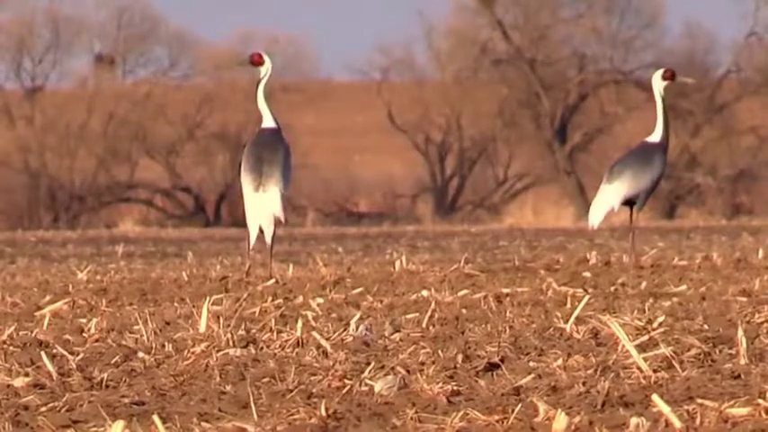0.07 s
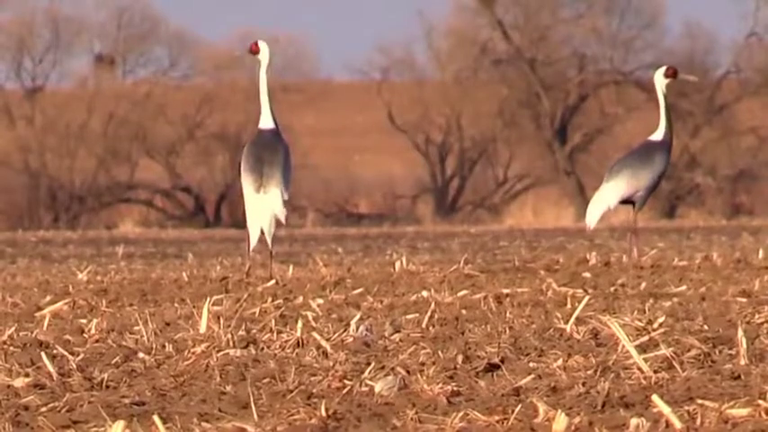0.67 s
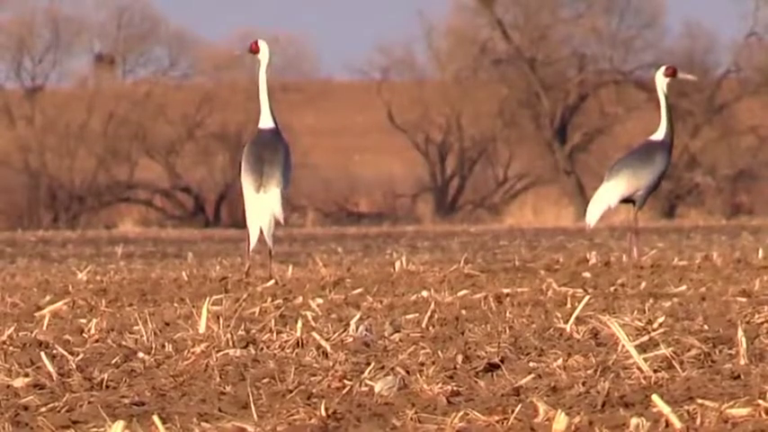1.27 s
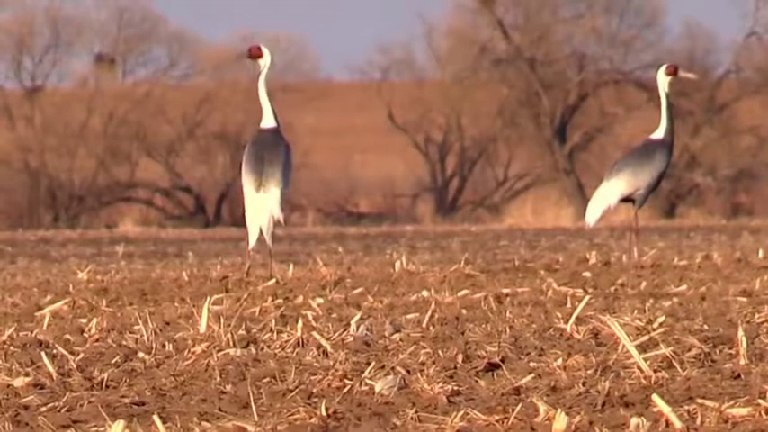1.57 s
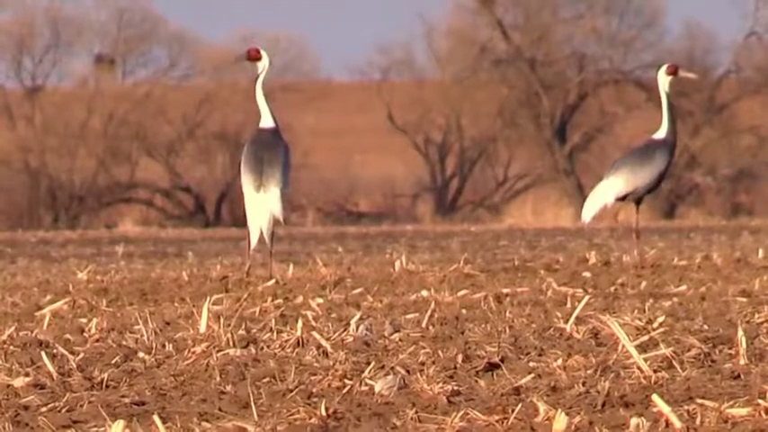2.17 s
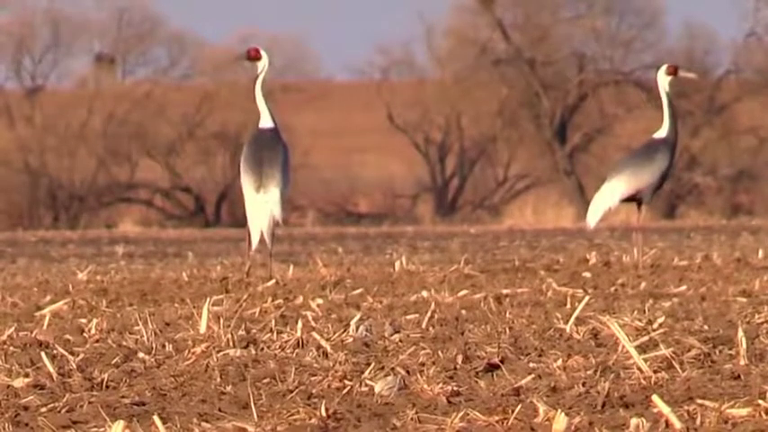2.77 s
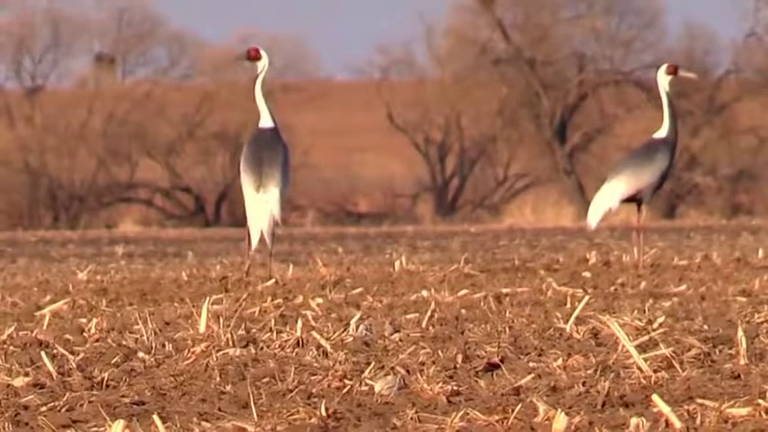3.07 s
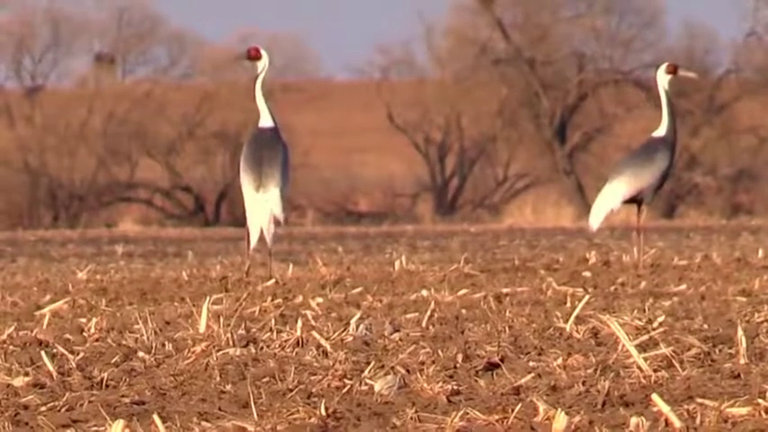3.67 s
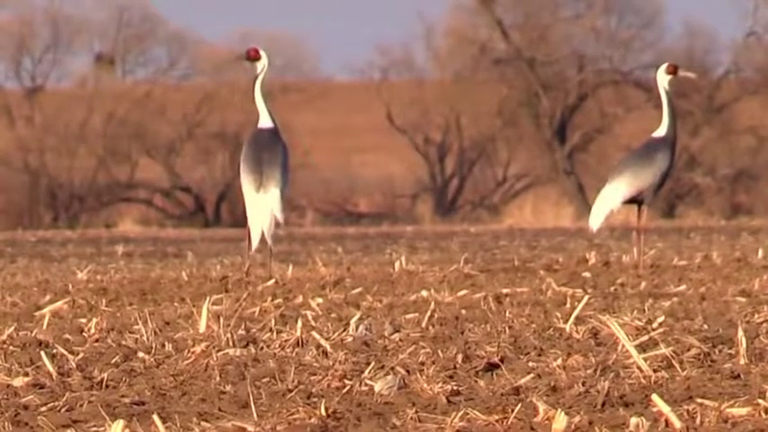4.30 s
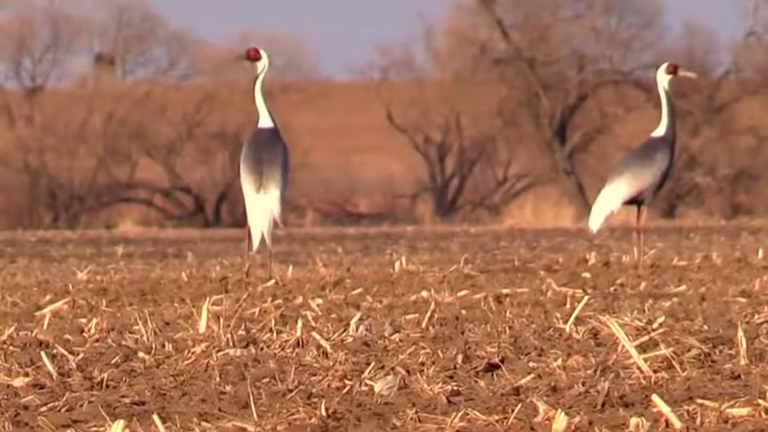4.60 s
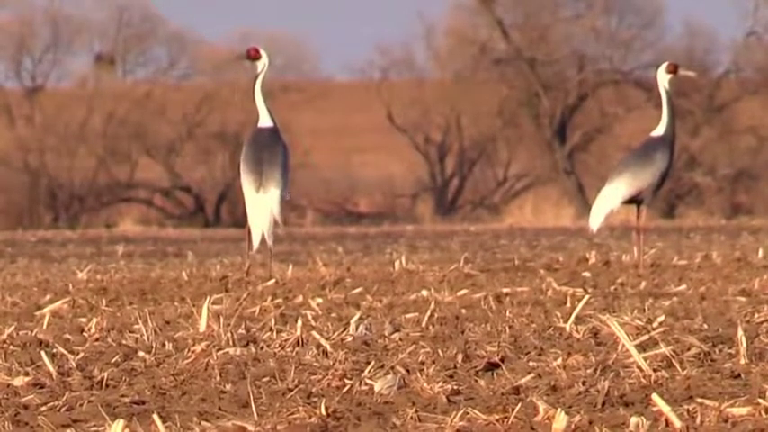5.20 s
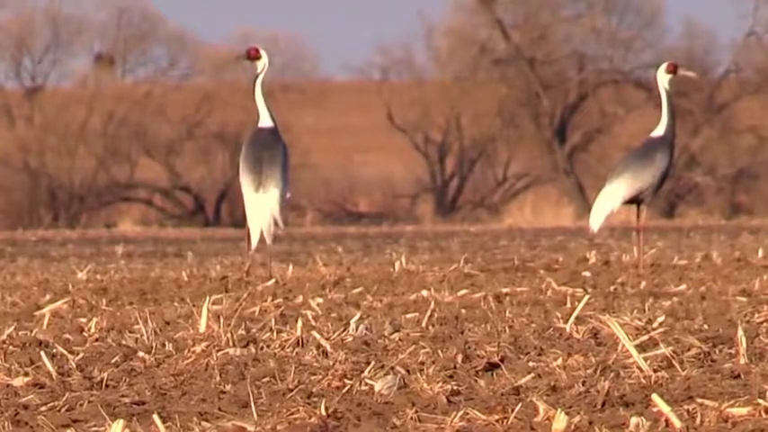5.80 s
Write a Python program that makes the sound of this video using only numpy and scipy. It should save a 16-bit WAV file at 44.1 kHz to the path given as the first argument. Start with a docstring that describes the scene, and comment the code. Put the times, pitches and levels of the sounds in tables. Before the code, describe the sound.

Low, fluttering wind buffets the microphone on the right, with small scuffs and taps, while a faint airy hiss sits on the left.

```python
"""Wind buffets a camera's right microphone in a stubble field: eddies rumble, thump, flutter and puff.
On that side the hollow camera body rushes in the moving air, and something dry close by
rustles, brushes and scuffs in showers of tiny slips, now and then knocking lightly on the camera.
The sheltered left side carries only the soft, even hiss of the open air."""
import sys
import numpy as np
from scipy import signal
from scipy.fft import rfft, irfft
from scipy.io import wavfile
from scipy.ndimage import uniform_filter1d

SR = 44100
rng = np.random.default_rng(int(sys.argv[2]) if len(sys.argv) > 2 else 0)


def transcribe(signal):
    """Save signal, clipped to [-1, 1], as a 16-bit WAV file at the path in sys.argv[1]."""
    frames = np.atleast_2d(signal).T
    limited = np.clip(frames, -1, 1)
    pcm = np.round(limited * 32767).astype(np.int16)
    wavfile.write(sys.argv[1], SR, pcm)


N = 266805
TIME = np.arange(N) / SR

# how hard the dry surfaces rub: time_s, level_db
RUBBING = [(0.0, -60), (0.78, -68), (1.12, -58.5), (1.21, -58.5), (1.42, -54), (1.8, -62.5), (1.95, -57.5),
           (2.2, -57), (2.47, -58.5), (2.89, -61.5), (3.15, -57), (3.42, -57), (3.48, -48.5), (3.66, -54),
           (3.8, -54), (3.94, -50), (4.09, -50), (4.18, -56), (4.29, -49.5), (4.71, -52.5), (4.83, -50),
           (4.99, -51.5), (5.27, -59), (5.38, -52.5), (5.69, -57.5), (5.9, -46.5), (6.05, -51)]


def amp(db):
    """Decibels to gain."""
    return 10 ** (np.asarray(db) / 20)


def unit(x):
    """Scales to an rms of one."""
    return x / np.sqrt(np.mean(x ** 2) + 1e-20)


def follow(curve):
    """Gain envelope through breakpoints of time_s, level_db."""
    return amp(np.interp(TIME, *np.transpose(curve)))


def colour(x, spectrum):
    """EQs x by rows of freq_hz, gain_db, rolling off past both ends; rms one."""
    hz = np.fft.rfftfreq(len(x), 1 / SR)
    points_hz, db = np.transpose(spectrum)
    rolloff = np.minimum(hz / points_hz[0], 1) ** 2 / np.maximum(hz / points_hz[-1], 1) ** 6
    gain = amp(np.interp(np.log(hz + 1), np.log(points_hz + 1), db)) * rolloff
    return unit(irfft(rfft(x) * gain, len(x)))


def wander(rate_hz):
    """Smooth random modulation up to about rate_hz; rms one."""
    hz = np.fft.rfftfreq(N, 1 / SR)
    return unit(irfft(rfft(rng.standard_normal(N)) * np.exp(-(hz / rate_hz) ** 2), N))


def slips(per_s, spread_db, size=N):
    """Tiny friction slips: a random train of clicks of uneven strength; rms one."""
    strength = amp(spread_db * np.minimum(rng.exponential(1, size), 4))
    polarity = rng.choice([-1, 1], size)
    slipping = rng.random(size) < per_s / SR
    return unit(strength * polarity * slipping)


def add(mix, s, sound):
    """Mixes in a sound centred on time s."""
    start = round(s * SR) - len(sound) // 2
    heard = sound[max(-start, 0):]
    part = mix[max(start, 0):][:len(heard)]
    part += heard[:len(part)]


def open_air():
    """A bed of even, pinkish hiss that swells slightly with the breeze."""
    # tone of the open air: freq_hz, gain_db
    air_eq = [(10.0, 5.5), (25.0, -6), (70.0, -2), (160.0, -7), (350.0, -12.5), (800.0, -16.5),
              (1600.0, -20.5), (3200.0, -23.5), (7000.0, -28), (12000.0, -29.5)]
    # strength of the breeze: time_s, level_db
    breeze = [(0.0, -54.5), (3.3, -53.5), (4.05, -51.5), (4.3, -54), (5.3, -52.5), (6.05, -54)]
    waver_db = .45 * wander(rate_hz=15)
    return colour(rng.standard_normal(N), air_eq) * follow(breeze) * amp(waver_db)


def body_rush(wind_db=-56.0, rub_db=-6, flutter_db=2.0, tap_share=0.17):
    """Moving air and tiny taps sound the hollow camera body below 1 kHz, more so under hard rubbing."""
    # resonances of the body: freq_hz, gain_db
    body_eq = [(250, -3.5), (450, -2), (620, -5.5), (830, -2), (960, -13.5), (1250, -25), (2000, -27.5),
               (4500, -41.5), (12500, -42)]
    air = np.sqrt(1 - tap_share) * rng.standard_normal(N)
    taps = np.sqrt(tap_share) * slips(per_s=200, spread_db=3)
    strength = np.hypot(amp(wind_db), amp(rub_db) * follow(RUBBING))
    return colour(air + taps, body_eq) * strength * amp(flutter_db * wander(rate_hz=45))


def rustle(trim_db=-5.0):
    """Dry surfaces slide over each other in dense slips, with a slightly uneven grip."""
    # tone of the dry friction: freq_hz, gain_db
    rustle_eq = [(500, 17.5), (1200, 5.5), (1700, 3.5), (2500, 6), (3200, 1.5), (4300, 7), (5100, 2.5),
                 (5900, -4), (6800, -4), (8200, -7), (10000, -12), (12500, -16)]
    grains = colour(slips(per_s=7000, spread_db=4.0), rustle_eq)
    grip_db = 1.1 * wander(rate_hz=22)
    return grains * follow(RUBBING) * amp(trim_db + grip_db)


def brushes():
    """Each light stroke is a crisp cluster of slips that swells and fades; the shortest ones snap."""
    # tone of brushed dry material: freq_hz, gain_db
    crisp_eq = [(550, -5), (830, -4), (1100, -1), (1900, 4.5), (2650, 10), (3300, 1.5), (4300, 7.5),
                (5350, 7), (5900, -2), (6800, 2), (8300, -2), (10500, -8), (12500, -17)]
    # brush strokes: centre_s, level_db, half_length_s, tilt_db_per_octave
    strokes = [(0.03, -68, .02, 0), (0.16, -63, .0035, 2), (0.27, -67, .015, 1), (0.296, -61, .003, 1),
               (0.588, -70, .012, 2), (0.646, -71, .012, 4), (0.788, -69, .01, 4), (0.85, -64, .018, 1),
               (0.99, -63.5, .022, 0), (1.06, -62, .03, 0), (1.37, -66, .1, 0), (1.133, -60, .002, 0),
               (1.16, -66, .025, 0), (1.616, -64, .003, -2), (1.711, -62, .005, -2), (1.892, -59, .008, -2),
               (2.305, -63, .007, -4), (2.274, -53, .009, -2), (2.405, -50.5, .0015, -2),
               (2.415, -49, .0018, -2), (2.547, -57, .009, -3), (2.63, -60, .011, 0),
               (3.085, -56.5, .016, -3), (3.19, -63, .006, -1), (3.273, -63, .007, -1),
               (3.376, -59.5, .011, 2), (3.485, -57, .008, -3), (3.53, -60, .04, 0), (3.694, -64, .02, 0),
               (4.095, -62, .03, 2), (4.828, -56.5, .018, 0), (6.0, -61, .08, 4)]
    out, t = np.zeros(N), np.arange(-SR // 3, SR // 3) / SR
    for centre_s, level_db, half_length_s, tilt in strokes:
        tilted_eq = [(hz, gain_db + tilt * np.log2(hz)) for hz, gain_db in crisp_eq]
        grains = colour(slips(per_s=9000, spread_db=-1.5, size=len(t)), tilted_eq)
        swell = np.exp(-.5 * (t / half_length_s) ** 2)
        add(out, centre_s, amp(level_db) * grains * swell)
    return out


def scuffs(trim_db=4.0, attack_ratio=0.51):
    """Bursts of slips in one resonance each, catching quickly and letting go more slowly."""
    # scuffs, dull when low, squeaky when high and narrow: peak_s, level_db, fade_s, pitch_hz, width_hz
    scrapes = [(0.866, -60, 0.0055, 2500, 3500), (0.868, -51, 0.004, 730, 330),
               (1.06, -68.5, 0.068, 4160, 2000), (1.51, -65, 0.02, 1600, 1500),
               (1.71, -58.5, 0.0049, 2030, 2500), (1.885, -61, 0.03, 1290, 2000),
               (1.886, -51.5, 0.0093, 1050, 900), (2.293, -56, .002, 1800, 1400),
               (2.542, -54.5, 0.006, 2780, 750), (2.544, -49.5, 0.0028, 2450, 900),
               (2.547, -55, .0035, 2000, 400), (2.546, -45, 0.0042, 795, 280),
               (2.932, -59, .003, 1400, 900), (3.235, -52.5, .005, 720, 400),
               (4.285, -52.5, 0.036, 740, 350), (4.49, -61, 0.0035, 4250, 400),
               (4.518, -54.5, 0.0074, 4290, 320), (4.535, -45, 0.0098, 617, 560),
               (4.539, -52.5, 0.0052, 4240, 480), (4.554, -54, 0.0046, 4240, 500),
               (4.554, -61, .012, 3780, 600), (4.648, -45.5, 0.0032, 4000, 900),
               (4.669, -44, 0.01, 500, 540), (4.677, -60, 0.0064, 4400, 380),
               (4.76, -58.5, 0.0075, 4200, 450), (4.795, -51, 0.022, 670, 443),
               (4.791, -57, .018, 4250, 1100), (4.824, -52.5, 0.011, 4150, 1600),
               (4.865, -65, 0.047, 4260, 1300), (5.408, -59, 0.0045, 4030, 500),
               (5.43, -47.5, 0.0019, 1200, 1800), (5.495, -67, 0.0092, 4300, 400),
               (5.902, -57.5, 0.019, 2700, 700), (5.919, -66, 0.056, 4570, 1200)]
    out, t = np.zeros(N), np.arange(-SR // 4, SR // 4) / SR
    hz = np.fft.rfftfreq(len(t), 1 / SR)
    for peak_s, level_db, fade_s, pitch_hz, width_hz in scrapes:
        resonance = 1 / (1 + abs(2 * (hz - pitch_hz) / width_hz) ** 3)
        low_cut = hz / (hz + 500)
        slope_s = np.where(t < 0, attack_ratio * fade_s, fade_s)
        pressure = np.exp(-.5 * (t / slope_s) ** 2)
        grains = slips(per_s=4000, spread_db=5.0, size=len(t))
        burst = irfft(rfft(grains) * resonance * low_cut, len(t)) * pressure
        makeup_gain = np.linalg.norm(pressure) / np.linalg.norm(burst)
        add(out, peak_s, amp(level_db + trim_db) * burst * makeup_gain)
    return out


def knocks(tick_db=-19, tick_hz=1400, tick_s=0.002):
    """Each soft contact swells and dies within a few cycles of the body's ring, with a faint tick."""
    # light knocks on the camera: centre_s, level_db, pitch_hz, half_length_s
    contacts = [(0.865, -35, 740, 0.0012), (1.3, -38, 900, 0.0006), (1.876, -36, 760, 0.0013),
                (1.884, -34.5, 825, 0.001), (1.892, -31.5, 706, 0.0011), (1.929, -38, 850, 0.0005),
                (2.407, -40.5, 794, 0.00086), (2.416, -43, 800, 0.0008), (3.038, -37.5, 950, 0.0004),
                (3.1, -37, 680, 0.0006), (4.538, -33.5, 690, 0.00083), (4.543, -33.5, 755, 0.00093),
                (4.665, -31.5, 597, 0.00064), (4.952, -38, 675, 0.0013), (5.431, -31.5, 680, 0.00074),
                (5.434, -26, 640, 0.0012), (5.474, -33, 770, 0.00062)]
    out, t = np.zeros(N), np.arange(-SR // 50, SR // 50) / SR
    for centre_s, level_db, pitch_hz, half_length_s in contacts:
        ring_phase, tick_phase = rng.random(2)
        ring = np.cos(2 * np.pi * (pitch_hz * t + ring_phase)) / np.cosh(t / half_length_s)
        tick = np.cos(2 * np.pi * (tick_hz * t + tick_phase)) * np.exp(-abs(t) / tick_s)
        add(out, centre_s, amp(level_db) * (ring + amp(tick_db) * tick))
    return out


def eddies(spectrum, gusts, lumps_db, trim_db):
    """Turbulence pushes on the microphone in quick lumps, while the gusts ride its level."""
    pressure = colour(rng.standard_normal(N), spectrum)
    # iron out the noise's own slow swells so that the gusts shape it
    swell = np.sqrt(uniform_filter1d(pressure ** 2, size=6000) + 1e-9)
    return pressure / swell * follow(gusts) * amp(trim_db + lumps_db * wander(rate_hz=25.5))


def buffeting():
    """Wind on the microphone: from largest to smallest, eddies rumble, thump, flutter and puff."""
    # tone of each eddy size: freq_hz, gain_db
    rumble_eq = [(8, -21), (15, -9), (25, -4), (45, -2.4), (65, 0), (80, -1), (92, -8)]
    thump_eq = [(70, -16), (92, 0), (125, -0.5), (142, -3.5), (155, -9)]
    flutter_eq = [(120, -11.5), (165, -2), (220, -8), (260, -18)]
    puff_eq = [(220, -4.5), (265, 2), (320, -6), (400, -14.5), (480, -18.5)]
    # envelope of each eddy size: time_s, level_db
    gusts = [(0.0, -30), (0.15, -28.5), (0.45, -28.5), (0.57, -24), (0.68, -36.5), (0.95, -30), (1.1, -36),
             (1.35, -28.5), (1.43, -31.5), (1.57, -24.5), (1.63, -25), (1.72, -22.5), (1.82, -30.5),
             (1.97, -25.5), (2.23, -34.5), (2.32, -26), (2.42, -31.5), (2.62, -22.5), (2.76, -31.5),
             (2.86, -26.5), (3.15, -30.5), (3.42, -28), (3.57, -36), (3.87, -24.5), (3.95, -33.5),
             (4.06, -38.5), (4.16, -30), (4.24, -33.5), (4.35, -25.5), (4.43, -36), (4.8, -27.5),
             (4.98, -28.5), (5.5, -31.5), (5.65, -27), (5.75, -31.5), (6.05, -31)]
    thumps = [(0.0, -33.5), (0.22, -28.5), (0.48, -28.5), (0.56, -26), (0.63, -32.5), (0.83, -31.5),
              (0.93, -26.5), (1.15, -32), (1.31, -29), (1.39, -35), (1.61, -26), (1.85, -31.5), (1.95, -36),
              (2.1, -30), (2.35, -34.5), (2.4, -29.5), (2.82, -32), (2.88, -25), (2.93, -30), (2.98, -30),
              (3.07, -38), (3.43, -30.5), (3.55, -35), (3.65, -29.5), (3.87, -30), (4.0, -37), (4.25, -33),
              (4.42, -36), (4.67, -34), (4.73, -25.5), (4.95, -34), (5.06, -26.5), (5.15, -32.5),
              (5.58, -30), (5.65, -28.5), (5.72, -40.5), (5.8, -27.5), (6.05, -38)]
    flurries = [(0.0, -40), (0.33, -31.5), (0.53, -36), (0.75, -27), (0.87, -32), (1.35, -38),
                (1.77, -33.5), (1.88, -32), (2.38, -33.5), (2.5, -38.5), (2.66, -30), (3.05, -39.5),
                (3.56, -39.5), (3.67, -30.5), (4.0, -42.5), (4.2, -34.5), (4.4, -39), (5.2, -35.5),
                (5.68, -37.5), (6.05, -37.5)]
    puffs = [(0.0, -46), (0.17, -50.5), (0.33, -43.5), (0.58, -44.5), (0.7, -43), (0.95, -44.5),
             (1.42, -54), (1.68, -40.5), (1.82, -47.5), (2.07, -42), (2.33, -47), (2.43, -43), (2.9, -44.5),
             (3.27, -50), (3.37, -40.5), (3.5, -52), (3.7, -44), (3.9, -50), (4.8, -49.5), (5.45, -43.5),
             (5.72, -50.5), (6.05, -46.5)]
    rumble = eddies(rumble_eq, gusts, lumps_db=2.0, trim_db=-.5)
    thump = eddies(thump_eq, thumps, lumps_db=0.74, trim_db=0.2)
    flutter = eddies(flutter_eq, flurries, lumps_db=1.0, trim_db=-2.0)
    puff = eddies(puff_eq, puffs, lumps_db=1.8, trim_db=0.1)
    return rumble + thump + flutter + puff


def scene():
    """Open air on the left; wind and close, dry textures on the right."""
    left = open_air()
    right = buffeting() + body_rush() + rustle() + brushes() + scuffs() + knocks()
    return np.array([left, right])


def record(dry):
    """A quick fade in and out, then the camera's steep high cut."""
    fade_s, cutoff_hz = .004, 13120
    fade = np.minimum(np.minimum(TIME, TIME[::-1]) / fade_s, 1)
    high_cut = signal.firwin(1023, cutoff_hz, window=("kaiser", 9), fs=SR)
    return signal.oaconvolve(dry * fade, high_cut[None], "same", axes=1)


dry = scene()
out = record(dry)
transcribe(out)
```